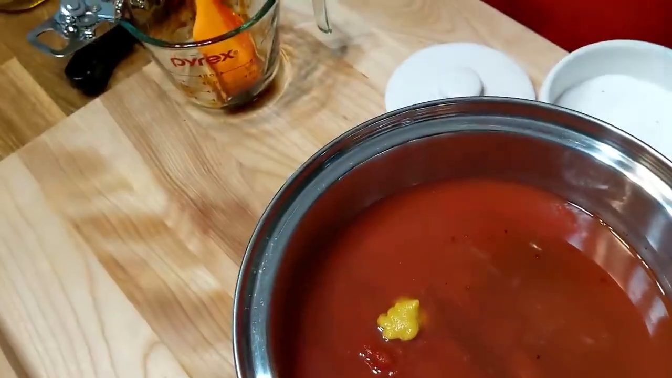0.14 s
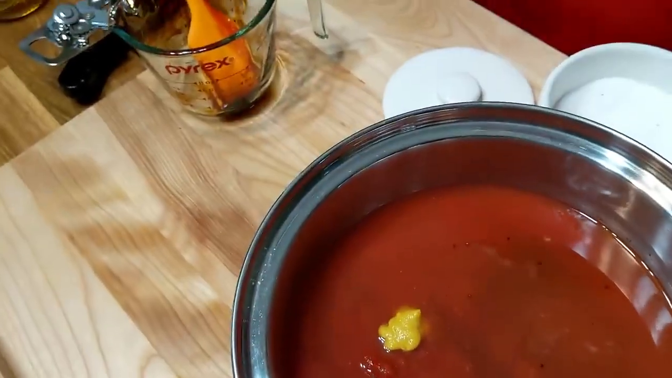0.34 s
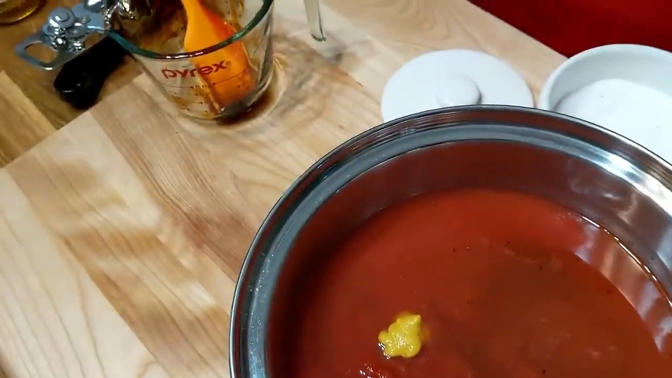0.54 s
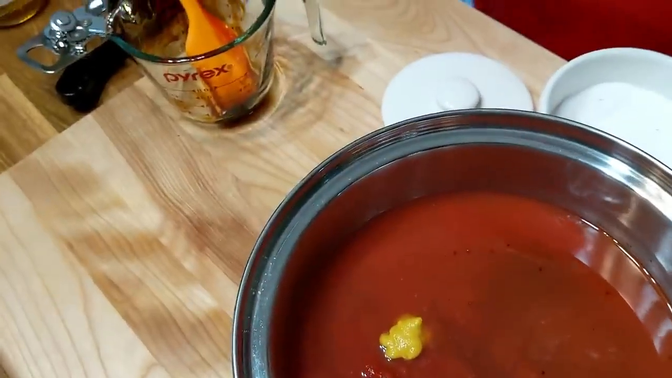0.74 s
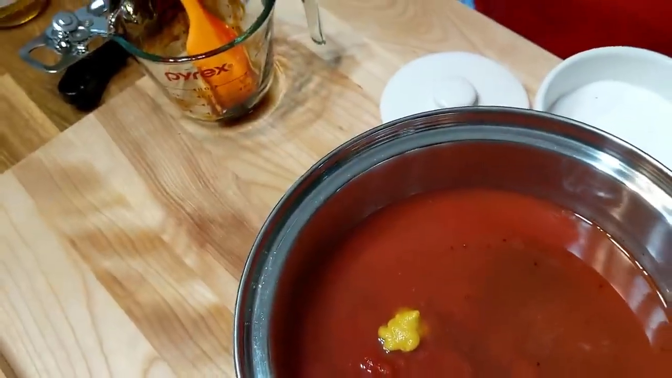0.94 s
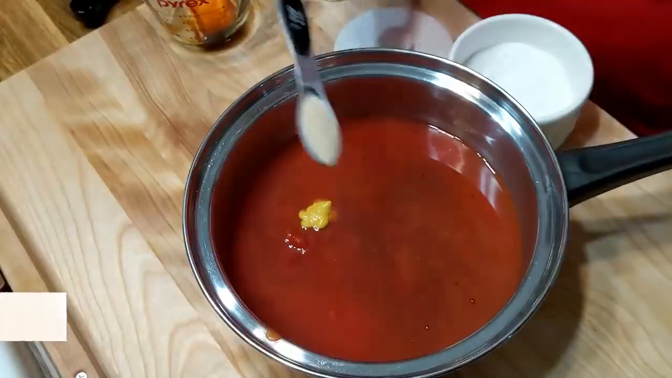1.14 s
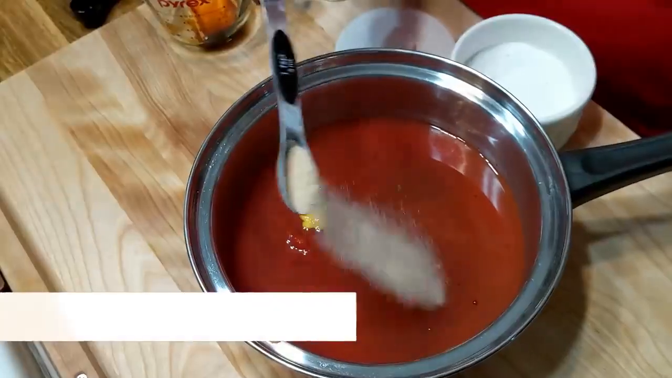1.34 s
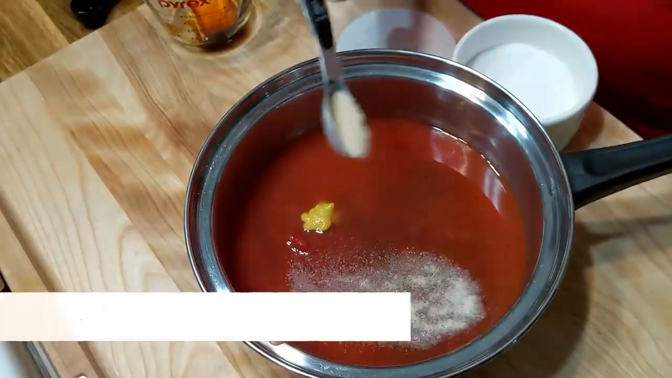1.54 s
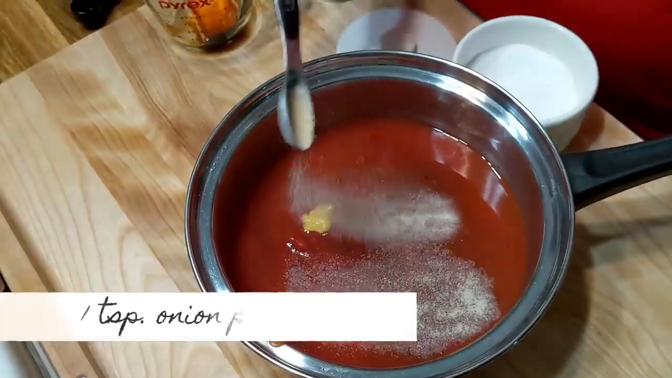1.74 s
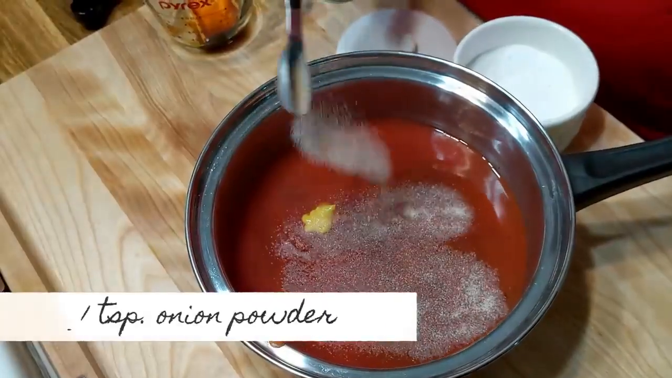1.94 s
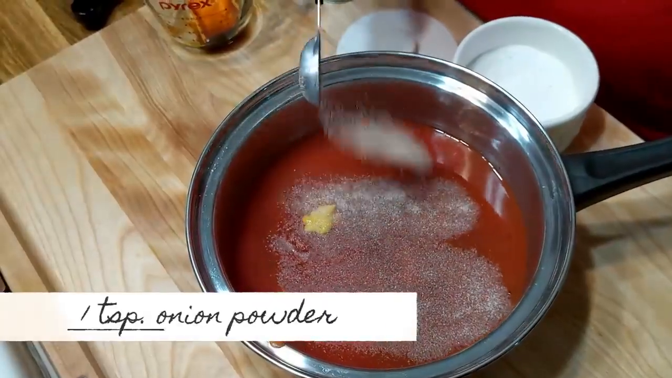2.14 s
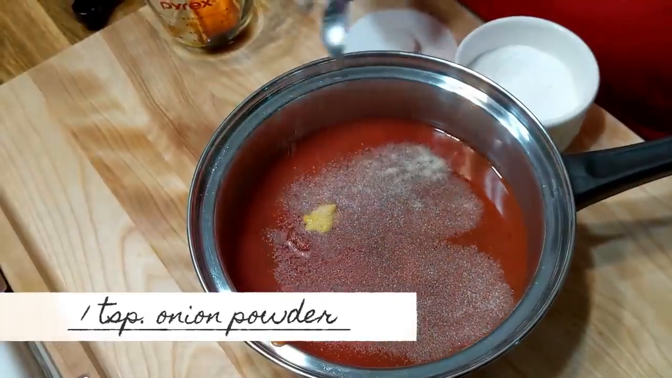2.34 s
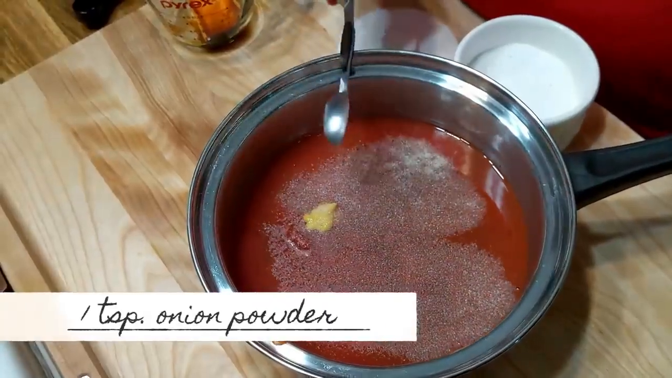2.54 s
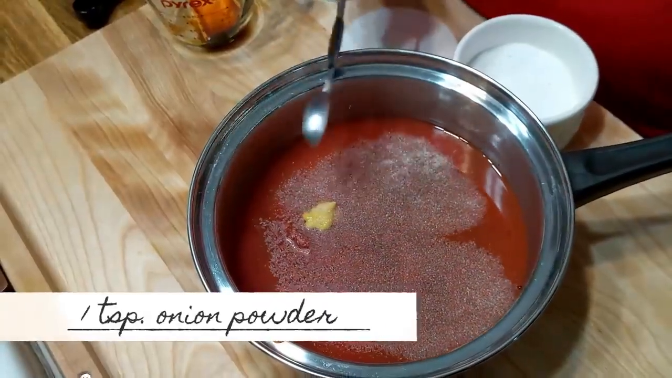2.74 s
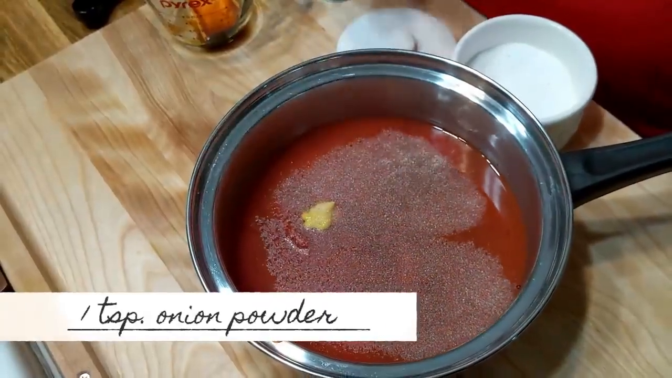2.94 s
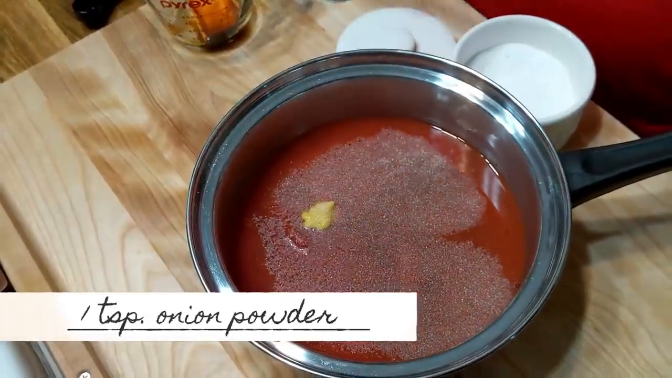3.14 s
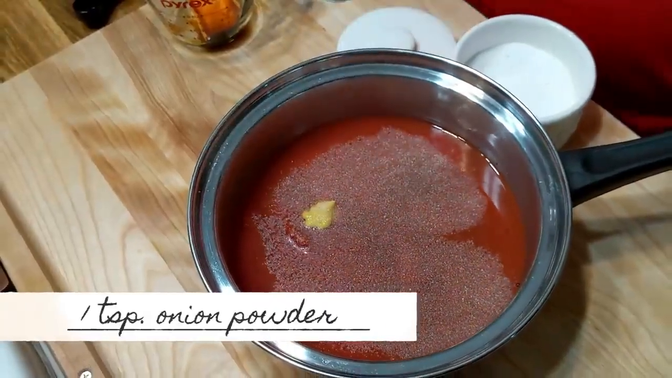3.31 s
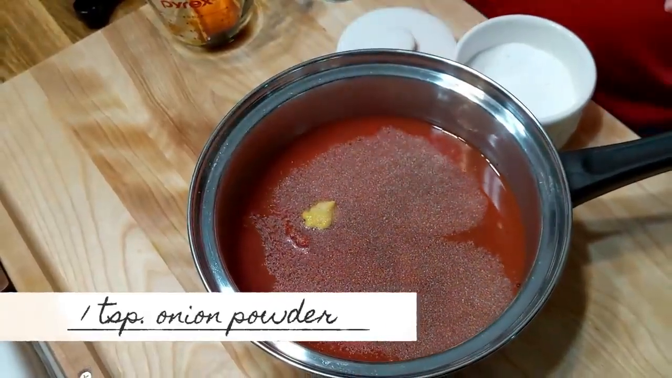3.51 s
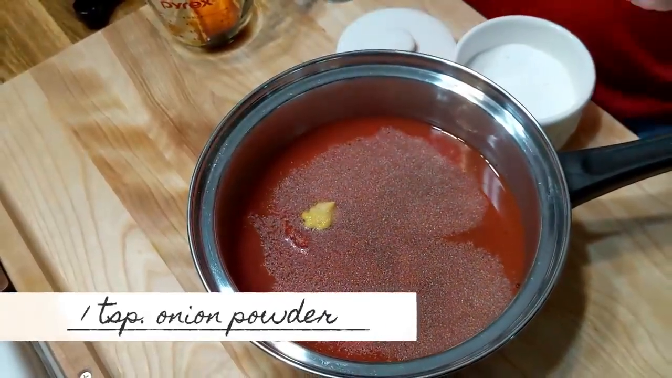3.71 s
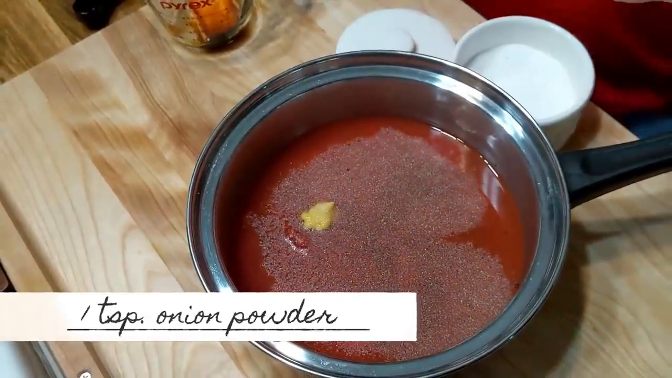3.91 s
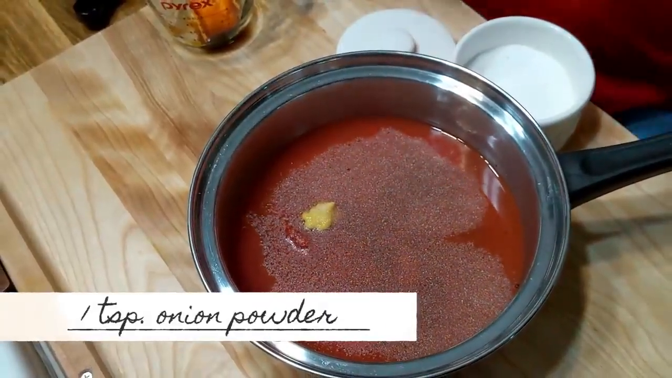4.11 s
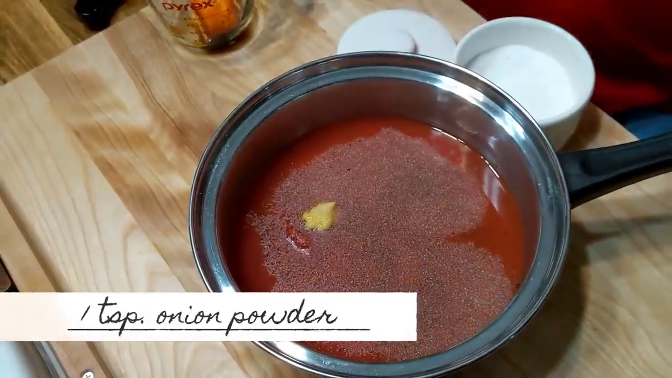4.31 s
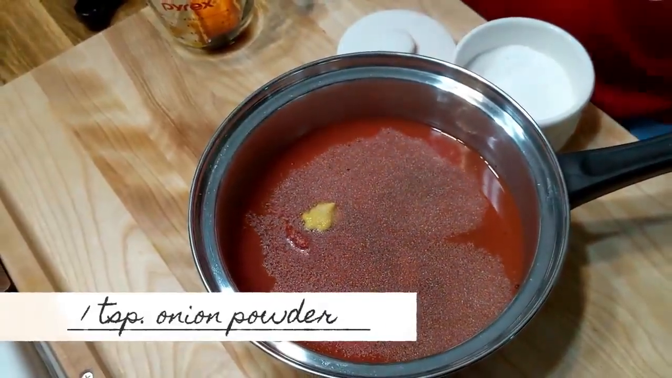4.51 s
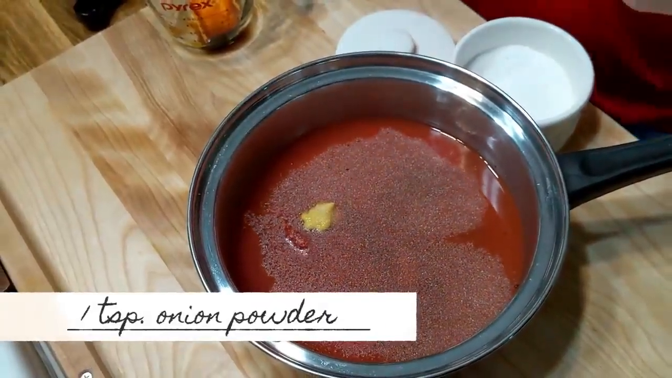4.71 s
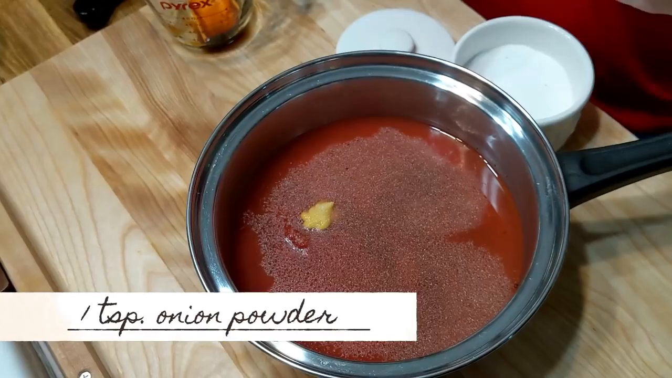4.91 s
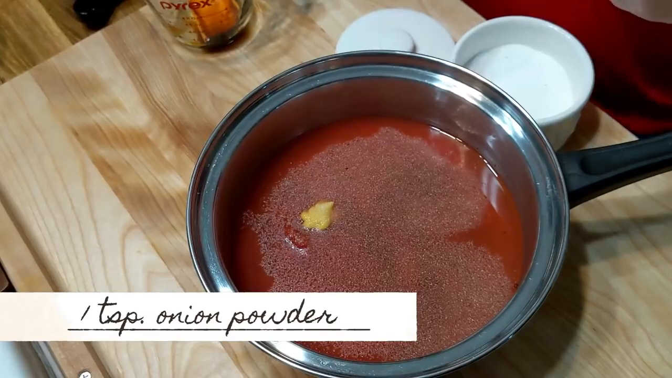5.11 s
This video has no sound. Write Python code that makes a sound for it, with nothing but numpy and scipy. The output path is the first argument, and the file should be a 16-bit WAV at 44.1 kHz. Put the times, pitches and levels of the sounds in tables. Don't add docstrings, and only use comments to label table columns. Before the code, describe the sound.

Close stereo phone pickup on a kitchen worktop: steady soft hum and airy fan hiss, faint rubbing and a jar set down on wood, then two hard metallic clangs from a spoon on a steel pan, a fifth of a second apart, distorted at the attack and ringing briefly. A quiet gap follows, before jars and the spoon are dragged and put down with sharp clicks, knocks and dull thuds.

```python
import sys
import numpy as np
from scipy import signal
from scipy.fft import rfft, irfft, next_fast_len
from scipy.io import wavfile
from scipy.ndimage import uniform_filter1d

SR = 44100
rng = np.random.default_rng(int(sys.argv[2]) if len(sys.argv) > 2 else 0)


def generate_wav(sig):
    pcm = np.round(np.clip(np.atleast_2d(sig).T, -1, 1) * 32767).astype(np.int16)
    wavfile.write(sys.argv[1], SR, pcm)


def ratio(d):
    e = np.asarray(d, float) / 20
    return 10 ** e


N = 232089


def read(table, hz):
    table_hz, value = np.transpose(table)
    return np.interp(np.log(np.maximum(hz, 1)), np.log(table_hz), value)


def shaped(table, size):
    fast = next_fast_len(size)
    hz = np.arange(fast // 2 + 1) * SR / fast
    spectrum = rfft(rng.standard_normal((2, fast))) * ratio(read(table, hz))
    noise = irfft(spectrum, fast)[:, :size]
    return noise / noise.std()


def bumps(x, peaks):
    fast = next_fast_len(N)
    hz = np.arange(fast // 2 + 1) * SR / fast
    db = sum(lift_db * np.exp(-((hz - centre) / width) ** 2) for centre, width, lift_db in peaks)
    return irfft(rfft(x, fast) * ratio(db), fast)[:, :N]


def fading(x, t60s):
    size = x.shape[1]
    t, spectrum, out = np.arange(size) / SR, rfft(x), 0
    octave = np.log2(np.arange(size // 2 + 1) * SR / size + 1)
    for hz in 80 * 2 ** (np.arange(24) / 3):
        share = np.clip(1 - 3 * abs(octave - np.log2(hz)), 0, 1)
        fall = ratio(-60 * t / max(read(t60s, hz), .01))
        out = out + irfft(spectrum * share, size) * fall
    return out


def ring(modes, scatter_db, split_hz, size):
    hz, db, t60 = np.transpose(modes)[:, :, None]
    t = np.arange(size) / SR
    chance = rng.standard_normal((4, 2, len(modes), 1))
    fall = ratio(db + scatter_db * chance[0] - 60 * t / np.clip(t60, .005, .75))
    beat_hz = split_hz * (1 + .4 * chance[1, 0])
    beat = 1 + .6 * np.sin(2 * np.pi * beat_hz * t + 3 * chance[2])
    phase = np.minimum(hz / 2500, 2) * chance[3]
    return np.sum(fall * beat * np.sin(2 * np.pi * hz * t + phase), axis=1)


def add(out, s, x, pan_db):
    i = int(s * SR)
    sides = ratio(np.array([[pan_db], [-pan_db]]) / 2)
    out[:, i:i + x.shape[1]] += (x * sides)[:, :N - i]


def walk(rate):
    k = int(SR / rate)
    steps = np.repeat(rng.standard_normal(N // k + 1), k)
    return 1.77 * uniform_filter1d(uniform_filter1d(steps, k), k)[:N]


# frequency in Hz, level in dB per Hz.
AIR_COLOUR = [(8.8, -8), (15, 7.5), (38, -3.5), (113, -3.5), (147, -12), (185, -10), (362, -14),
              (632, -19.5), (775, -16.5), (979, -24), (1310, -27), (1860, -29), (3240, -26), (10700, -38.5),
              (16200, -33)]
# frequency in Hz, likeness from 0 to 1.
AIR_LIKENESS = [(60, 0.99), (130, 0.99), (290, 0.74), (640, 0.33), (1410, 0.38), (3100, -0.0), (6820, 0),
                (15000, 0)]
# frequency in Hz, level in dB rms.
MOTOR_HUM = [(60, -55.5), (108, -55), (121, -53), (178, -61.5), (357, -62), (673, -63.5), (1351, -69.5)]


def air():
    level_db = -42.5
    fast, t = next_fast_len(N), np.arange(N) / SR
    hz = np.arange(fast // 2 + 1) * SR / fast
    mid, side = rfft(shaped(AIR_COLOUR, fast))
    alike = np.clip(read(AIR_LIKENESS, hz), 0, 1)
    spectrum = np.sqrt(1 + alike) * mid + np.sqrt(1 - alike) * side * np.array([[1], [-1]])
    noise = irfft(spectrum, fast)[:, :N]
    noise = noise / noise.mean(axis=0).std() * ratio(level_db + 0.49 * walk(2.62))
    lines = 0
    for f, db in MOTOR_HUM:
        lines = lines + ratio(db + 1.5 + 2.5 * walk(6)) * np.sin(2 * np.pi * f * t + .8 * walk(3))
    return noise + lines


# start of full speed in seconds, time held in seconds, level in dB.
SLIDE_STROKES = [(.2, 0.0059, -60), (.35, .02, -53.5), (.55, .11, -60), (.7, .07, -60), (.93, .05, -54.5),
                 (1.136, .01, -54.5), (1.27, .01, -67), (2.0, .01, -65), (2.18, .02, -55.5),
                 (2.29, .01, -62), (2.465, .03, -60.5), (3.995, .045, -56), (4.44, .01, -51.5),
                 (4.59, 0.0082, -53), (4.675, 0.06, -46), (4.915, 0.041, -54), (5.001, .01, -49.5),
                 (5.045, 0.045, -47), (5.129, 0.039, -44)]
# frequency in Hz, level in dB per Hz.
FRICTION_COLOUR = [(240, -47), (400, 0.5), (460, -3), (676, -5.5), (742, -5.5), (906, 1.5), (1130, -22.5),
                   (1460, -14), (1900, -16), (2800, -8.5), (3530, -11), (4180, -12), (6540, -13.5),
                   (7630, -21.5), (16000, -14)]
# frequency in Hz, width in Hz, strength in dB.
JAR_RESONANCES = [(1479, 46, 4.5), (2700, 56, -3.5), (3300, 40, -9), (4025, 150, 6.5), (4760, 24, -22),
                  (5505, 95, 0.5), (7740, 440, -4)]


def sliding():
    speed_up_db_s, slow_down_db_s = 201, 176
    t, gain = np.arange(N) / SR, np.zeros(N)
    for s, held, db in SLIDE_STROKES:
        before, after = np.maximum(s - t, 0), np.maximum(t - s - held, 0)
        gain += ratio(db - speed_up_db_s * before - slow_down_db_s * after)
    uneven = ratio(2.65 * np.array([walk(70), walk(70)]))
    gain = uniform_filter1d(gain, size=900) * uneven
    peaks = [(f, width, max(8 + 0.49 * db, 0)) for f, width, db in JAR_RESONANCES]
    rub = bumps(shaped(FRICTION_COLOUR, N), peaks)
    return ratio(3.0) * gain * rub * ratio(np.array([[-1.4], [1.4]]))


# start in seconds, knock level in dB, knock pitch in Hz, crack level in dB, scatter level in dB.
EARLY_CONTACTS = [
    (.3675, -46.5, 1794, -49, -29.5),
    (.708, -28.5, 950, -34.5, -21.5),
    (.735, -47, 4260, -50, -30),
    (2.459, -69, 3000, -44.5, -44.5),
]
MIDDLE_CONTACTS = [
    (3.962, -46.5, 2440, -65.5, -30),
    (3.975, -42, 1400, -57.5, -34.5),
    (3.985, -57, 6970, -46.5, -33.5),
    (3.992, -33.5, 864, -43, -32.5),
]
LATE_CONTACTS = [ (4.3685, -8.5, 2627, -47, -25.5), (4.398, -34, 4600, -38, -21.5),
                 (4.403, -36, 7500, -42, -16), (4.4165, -15, 5820, -24.5, -13.5),
                 (4.4172, -19.5, 5170, -29, -42), (4.4175, -23, 7500, -33, -41),
                 (4.434, -30, 3400, -33, -21), (4.5405, -27.5, 4760, -18, -21.5),
                 (4.545, -31.5, 2260, -40.5, -36), (4.555, -34, 7700, -36, -29),
                 (4.5735, -36, 837, -23, -21), (4.680, -32.5, 800, -20.5, -11.5)]
# frequency in Hz, level in dB, t60 in seconds.
SPOON_MODES = [(1526, -1, 0.091), (2500, 2, 0.073), (2735, -4, 0.35), (2800, 3.5, 0.12), (4100, 5, 0.12),
               (5030, -14, .15), (5389, -26, .18), (5560, -18, .15), (6240, -18, 0.23), (7700, -11, .12)]


def board(events, knock_s, spoon_db, dull_db, pan_db, drift_db_s=0.):
    out, size = np.zeros((2, N)), SR // 2
    t = np.arange(size) / SR
    crack_colour = [(3000, -29.5), (7000, -3.0), (16000, -14)]  # Hz, dB
    scatter_colour = [(500, -17.5), (1200, -6.5), (3000, -1.5), (5000, -2.5 + dull_db), (8000, -15 + dull_db)]
    crack_fall = np.exp(-t / 0.0017) + 0.11 * np.exp(-t / 0.031)
    scatter_fall = np.exp(-t / 0.0017) + 0.26 * np.exp(-t / 0.025)
    rise = 1 - np.exp(-t / 0.00034)
    for s, db, hz, crack_db, scatter_db in events:
        knock = ratio(db) * np.exp(-(t / knock_s - 1.5) ** 2) * np.sin(2 * np.pi * hz * t)
        crack = ratio(crack_db) * shaped(crack_colour, size) * crack_fall
        scatter = ratio(scatter_db - 9) * shaped(scatter_colour, size) * scatter_fall
        near = [(f, mode_db - 14 * abs(np.log2(f / hz)), t60) for f, mode_db, t60 in SPOON_MODES]
        spoon = ratio(db + spoon_db) * ring(near, 2.1, 36, size)
        contact = knock + rise * (crack + scatter + spoon)
        add(out, s, contact, pan_db + drift_db_s * (s - events[0][0]))
    return out


def contacts():
    early = board(EARLY_CONTACTS, 0.0042, -31, -1.7, pan_db=-10.5)
    middle = board(MIDDLE_CONTACTS, 0.0028, -29, -23, pan_db=-11.5)
    late = board(LATE_CONTACTS, .0014, -21, -1, pan_db=-13.5, drift_db_s=21)
    return early + middle + late


# start in seconds, peak in dB, pitch in Hz, t60 in seconds.
BOARD_THUDS = [(.644, -42.5, 380.5, 0.24), (2.7, -26.5, 69.6, 0.48), (2.899, -30, 74.5, 0.52),
               (0.709, -36, 187, 0.057), (3.805, -37, 44.7, 0.16), (4.369, -31.5, 343.6, 0.2),
               (4.417, -30.5, 334.6, 0.15), (4.543, -31, 295, 0.067), (4.573, -26.5, 201.5, 0.14),
               (4.675, -22.5, 219, 0.044), (4.68, -26, 308, 0.084), (4.691, -24.5, 112, 0.066)]
# start in seconds, level in dB, pitch in Hz, t60 in seconds.
GLASS_TING = (3.993, -41, 2796.5, 0.3)


def thuds():
    out, t = np.zeros((2, N)), np.arange(SR // 2) / SR
    for s, db, hz, t60 in BOARD_THUDS:
        modes = [(hz, db, t60), (1.643 * hz, db - 7.5, 0.4 * t60), (870, db - 11, .07)]
        bloom = 1 - np.exp(-t * (hz / 200) ** 3 / 0.001)
        add(out, s, ring(modes, 2.2, 0, size=len(t)) * bloom, 0)
    s, db, hz, t60 = GLASS_TING
    add(out, s, ring([(hz, db, t60)], 0.8, 3.4, size=len(t))[:1], -5)
    return out


# start in seconds, peak in dB, left minus right in dB,
# bias swing of the left microphone and of the right, both in full scale.
RIM_RAPS = [
    (2.6716, -5, -4.5, 0.23, 0.43),
    (2.8760, -6.5, -4, -0.33, -0.51),
]
RIM_HZ = [724, 853, 1294, 1405, 1450, 1576, 2180, 2301, 3128, 3532, 3595, 3629, 3997, 4029, 4094, 4166,
          4500, 4630, 4825, 4975, 5071, 5436, 5510, 5588, 5920, 6127, 6866, 6968, 7499, 7569]
# level in dB, t60 in seconds.
RIM_MODES = [(-30.5, 0.28), (-27.5, 0.27), (-28, 0.48), (-41, 0.65), (-25.5, 0.21), (-27, 0.13),
             (-39.5, 0.31), (-35.5, 0.26), (-28.5, 0.35), (-21, 0.31), (-35, .6), (-27, 0.4), (-29, 0.37),
             (-30.5, 0.72), (-27, 0.72), (-34.5, 0.83), (-27, 0.37), (-30, 0.2), (-21, 0.27), (-31.5, 0.43),
             (-30, 0.19), (-35.5, 0.73), (-21, 0.23), (-39, .6), (-22.5, 0.16), (-17.5, 0.23),
             (-16.5, 0.12), (-24, 0.18), (-14.5, 0.15), (-35, 0.48)]
# frequency in Hz, level in dB per Hz.
WALL_COLOUR = [(150, -5), (500, -12.5), (720, -4.5), (1060, -2.5), (1450, -12.5), (1750, -8.5),
               (2200, -10.5), (2850, -16.5), (3500, -6.5), (6100, -5.5), (7500, -4.5), (8700, -9),
               (12000, -16.5), (15700, -15)]
# frequency in Hz, t60 in seconds.
WALL_T60 = [(300, 0.37), (1000, 0.7), (4000, 0.63), (8000, 0.42), (16000, 0.18)]


def saucepan():
    out, size, count = np.zeros((2, N)), SR, 500
    t = np.arange(size) / SR
    rim = np.column_stack([RIM_HZ, RIM_MODES])
    crowd_hz = rng.choice(RIM_HZ, count) * (1 + .022 * rng.standard_normal(count))
    spread_hz = 300 + 15400 * rng.random(count)
    stray = (spread_hz > 7600) | (spread_hz > 3000) & (rng.random(count) < .3)
    wall_hz = np.where(stray, spread_hz, crowd_hz).astype(int)
    crack_fall = ratio(-5.5) * np.exp(-t / 0.0044) + ratio(-6.5) * np.exp(-t / 0.051)
    onset = 1 - np.exp(-t / 0.0001)
    for s, db, pan_db, *_ in RIM_RAPS:
        chance = rng.standard_normal((3, 2, count))
        lines = np.zeros((2, size // 2 + 1), complex)
        phase = 9 * chance[1, 0] + np.minimum(wall_hz / 2000, 2) * chance[2]
        lines[:, wall_hz] = ratio(read(WALL_COLOUR, wall_hz) + 2.9 * chance[0]) * np.exp(1j * phase)
        wall = irfft(lines, size)
        wall = ratio(-9.5) * fading(wall / wall.std(), WALL_T60)
        crack = shaped(WALL_COLOUR, size) * crack_fall
        clang = ratio(8.0) * ring(rim, 2.95, 9.4, size) + wall + crack
        add(out, s, ratio(db) * clang * onset, pan_db)
    return bumps(out, [(800, 330, 3.7 * np.array([[1], [-1]]))])


def bias():
    out, t = np.zeros((2, N)), np.arange(SR) / SR
    jump = (1 - np.exp(-t / np.array([[.003], [.008]]))) * np.exp(-t / 0.215)
    highpass = signal.butter(N=2, Wn=3.5, btype="high", fs=SR, output="sos")
    swing = signal.sosfilt(highpass, jump)
    for s, _, _, left, right in RIM_RAPS:
        add(out, s, swing * np.array([[left], [right]]), 0)
    return out


# frequency in Hz, t60 in seconds.
ROOM_T60 = [(200, 0.23), (1000, 0.43), (5000, 0.49), (16000, 0.32)]


def kitchen(x):
    t = np.arange(SR // 2) / SR
    tail = fading(rng.standard_normal((2, SR // 2)), ROOM_T60)
    tail *= 1 - np.exp(-(t / 0.0012) ** 2)
    return signal.fftconvolve(x.mean(axis=0)[None], tail, axes=1)[:, :N]


def scene():
    pan = saucepan()
    things = contacts() + thuds()
    room = kitchen(ratio(-40.5) * pan + ratio(-36) * things)
    near = pan + things + room + sliding()
    return bumps(near, [(6570, 230, -12.0)]) + air()


def band_limit(x):
    return signal.sosfilt(signal.butter(12, 15750, fs=SR, output="sos"), x)


# frequency in Hz, width in Hz, lift in dB.
PORT_COLOUR = [(84.8, 14.6, -6.5), (1920, 205, -2.5), (8500, 360, -3), (10770, 440, -4), (13800, 540, -5),
               (16530, 600, 16)]


def record(dry):
    dry = bumps(dry, PORT_COLOUR)
    memory = .3 * SR
    power = np.mean(dry ** 2, axis=0)
    heard = signal.lfilter([1], [1, -np.exp(-1 / memory)], power) / memory
    ducked = dry / (1 + heard / ratio(-50.5)) ** 0.1
    mix = np.clip(ducked + bias(), -1, 1)
    return band_limit(mix)


dry = scene()
out = record(dry)
generate_wav(out)
```